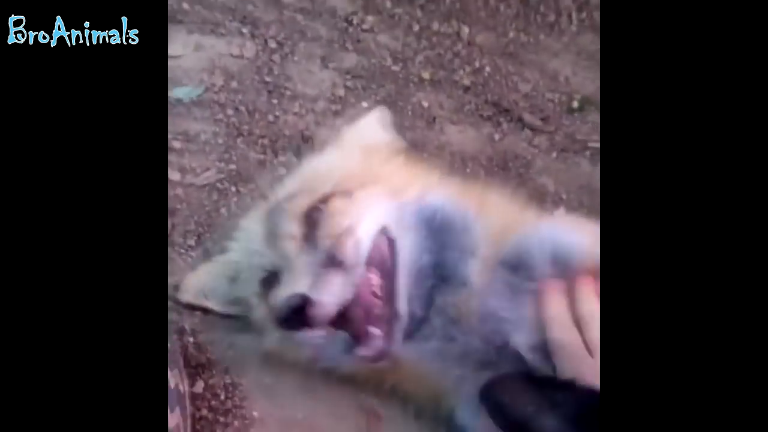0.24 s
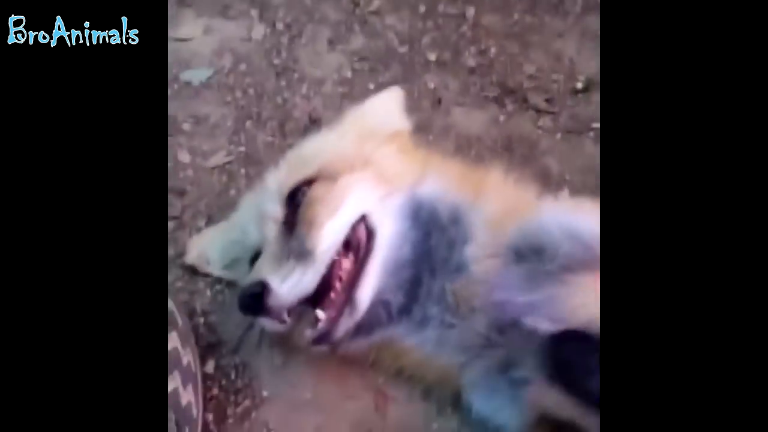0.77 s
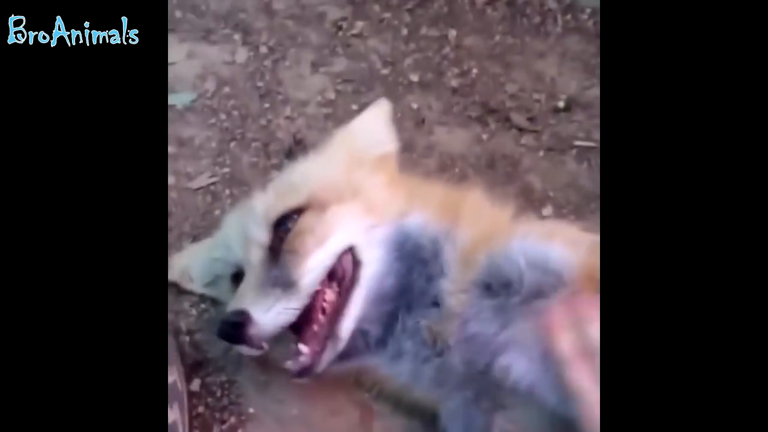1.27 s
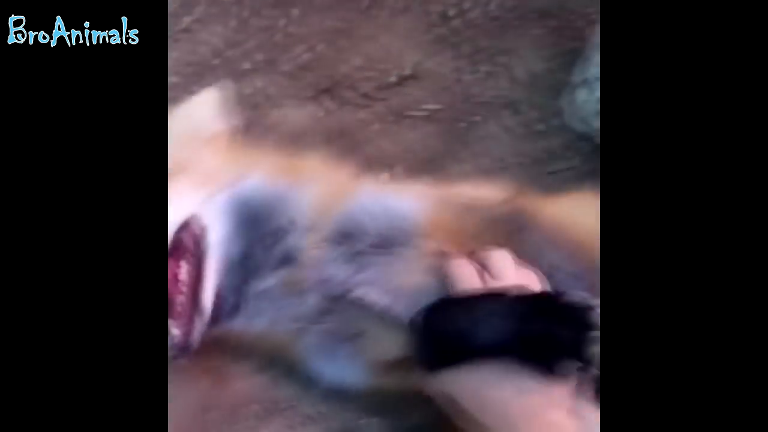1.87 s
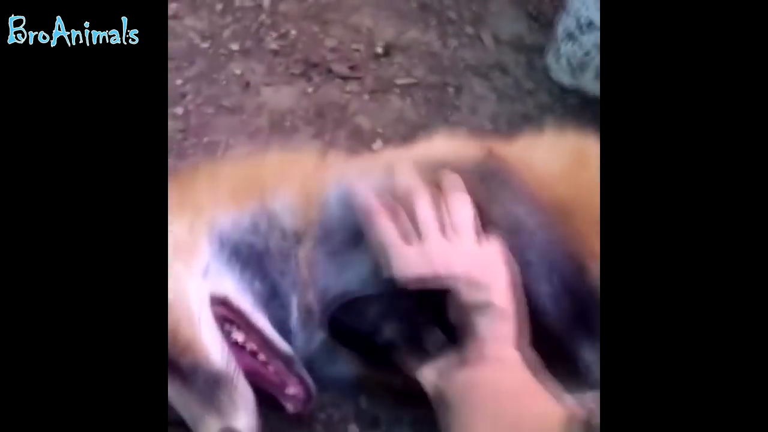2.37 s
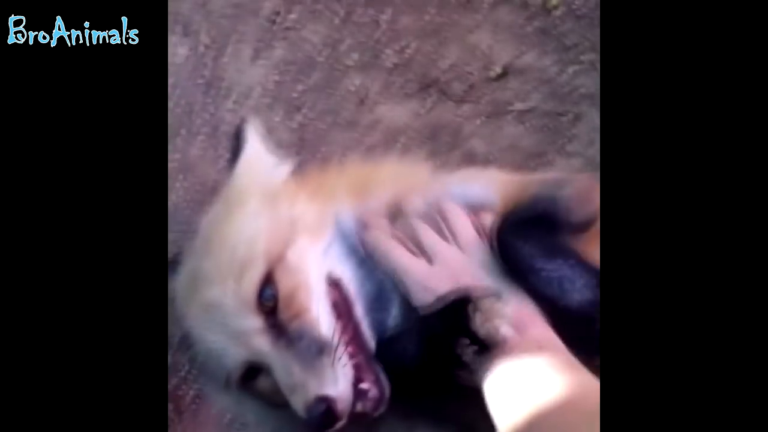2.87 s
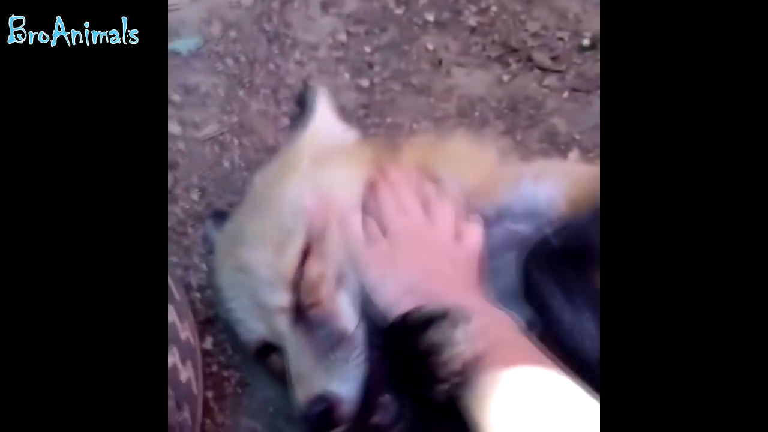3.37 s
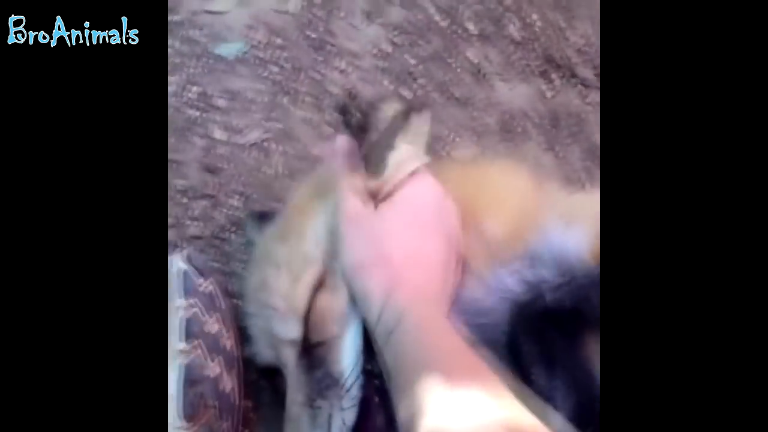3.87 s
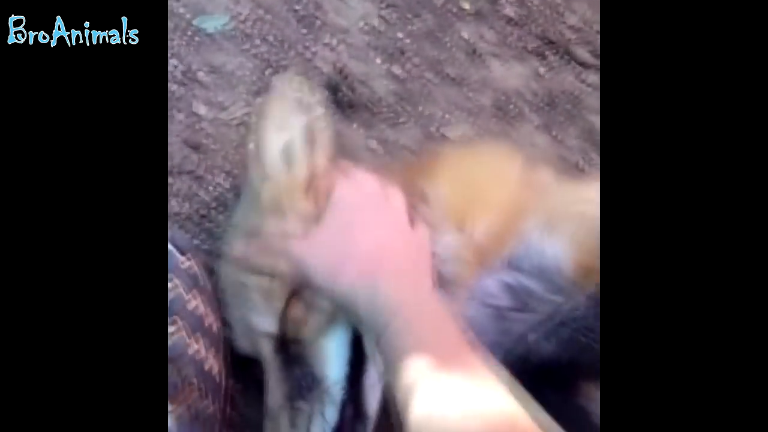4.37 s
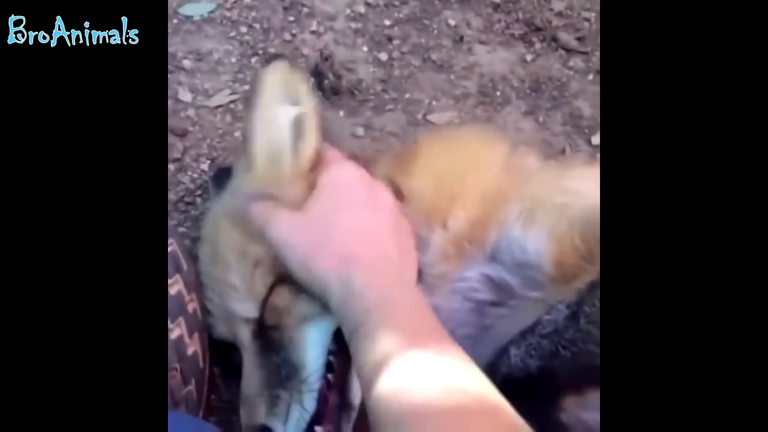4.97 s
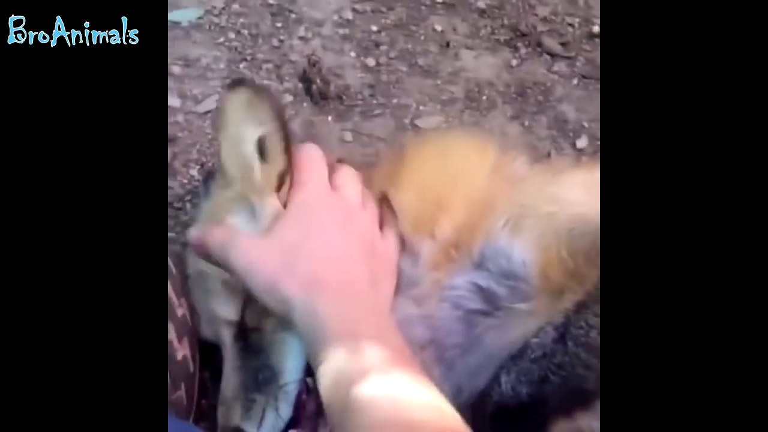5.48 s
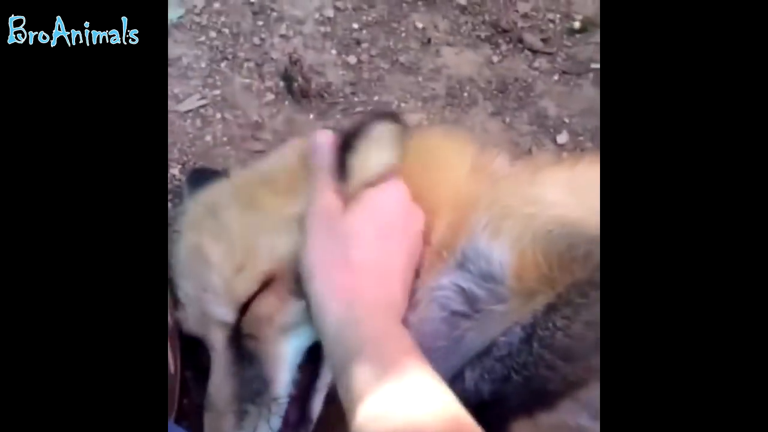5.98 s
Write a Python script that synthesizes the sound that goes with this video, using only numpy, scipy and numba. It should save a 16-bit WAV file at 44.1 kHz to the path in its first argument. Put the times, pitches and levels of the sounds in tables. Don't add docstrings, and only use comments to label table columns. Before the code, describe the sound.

A fox vocalizes close to a phone outdoors, nearly dry, over very faint low yard rumble. It opens mid-cry: a bright, nasal whine around 600 Hz, fluttering about 24 times a second like a bleating giggle, until 0.7 s. After a short gap, a longer whine from 0.9 to 2.1 s starts low and raspy, climbs to its loudest, highest point near 1.5-1.6 s, then smooths and fades. Shorter, slightly lower fluttering whines follow at 2.25-2.8 and 2.95-3.55 s, then a weaker, sinking one at 3.7-4.0 s. From 4.15 s come short hoarse yips around 300-400 Hz: a clear one, a softer rough one at 4.5, low croaky ones at 4.8 and 5.05, a rising and falling one at 5.3-5.5, a loud longer one at 5.7, and a last raspy one near 6.1 s. Breath puffs and soft chest grunts accompany them.

```python
import sys
import numpy as np
from scipy import signal
from scipy.fft import rfft, irfft, next_fast_len
from scipy.io import wavfile
from scipy.ndimage import uniform_filter1d
from numba import njit

SR = 44100
rng = np.random.default_rng(int(sys.argv[2]) if len(sys.argv) > 2 else 0)


def store_wav(level_fs):
    pcm = np.round(np.clip(np.atleast_2d(level_fs), -1, 1) * 32767)
    wavfile.write(sys.argv[1], SR, pcm.T.astype(np.int16))


def volts_from_decibels(level):
    exponent = np.asarray(level, float) / 20
    return 10 ** exponent


N = 275139
HOP = 32
SLACK_HZ = 340


def voice(count=34):
    # t/s, jaw resonance f/Hz, tongue resonance f/Hz
    cavities = [(0, 1266, 3140), (.35, 1295, 3220), (.7, 1108, 2528), (.96, 1044, 2475), (1.4, 1192, 2998),
                (1.54, 1375, 2300), (1.72, 1248, 2793), (2.05, 1274, 2175), (2.3, 1428, 2223),
                (2.6, 1070, 2435), (3.02, 1249, 2265), (3.4, 1146, 2517), (3.72, 874, 2326),
                (3.95, 875, 2352), (4.2, 847, 3034), (5.2, 850.4, 2830), (5.44, 972, 2317),
                (5.8, 876, 2926)]
    # t/s, jaw width/Hz, tongue width share
    widths = [(0, 400, 0.78), (.2, 320, 1.01), (.45, 280, 1.01), (.7, 347, 0.9), (.96, 451, 1.01),
              (1.2, 402, 0.78), (1.5, 400, 1.01), (1.75, 350, 1.4), (2.05, 349, 1.3), (2.3, 500, 0.88),
              (2.6, 446, 1.01), (3.02, 603, 1.2), (3.2, 599, 1.01), (3.45, 498, 1.3), (3.8, 404, 0.89),
              (4.2, 400, 0.89), (5.44, 504, 0.67), (5.8, 400, 1.05)]
    # f/Hz, level/dB
    teeth_colour = [(3500, -4), (4400, 5.5), (5210, 5), (6200, 2.5), (8530, -7.5), (9780, -14.5),
                    (11200, -18), (13300, -22), (15500, -38.5)]

    t = np.arange(N // HOP + 2) * HOP / SR
    hz, db, dip_db, (held_hz, lift_db, rasp_db, bite_db, rough) = flutter(t, rise=.24, fall_s=.0052)
    jaw_db, tongue_db, teeth_db = mouth(held_hz, lift_db, rasp_db, bite_db)
    jaw_hz, tongue_hz = rows(cavities, t)
    jaw_width_hz, tongue_share = rows(widths, t)
    tongue_width_hz = tongue_share * np.clip(11.0 * (held_hz - SLACK_HZ), 650., 1500.)
    rough = rough - .0012 * dip_db

    f = np.arange(1, count + 1)[:, None] * hz
    scatter = np.exp(2j * np.pi * rng.random((count, 1)))
    teeth = shape(teeth_colour, f) * (f > 3600) * (f < 15500) * scatter
    teeth = teeth / np.sqrt(np.sum(np.abs(teeth) ** 2, axis=0))

    voiced = np.clip((hz - SLACK_HZ) / 200, .15, 1)
    partial = volts_from_decibels(0.62 * dip_db) * cavity(f, hz, 66.0)
    partial = partial + volts_from_decibels(jaw_db) * cavity(f, jaw_hz, jaw_width_hz)
    partial = partial - volts_from_decibels(tongue_db + .9 * dip_db) * cavity(f, tongue_hz, tongue_width_hz)
    partial = partial + voiced * volts_from_decibels(teeth_db + 2.5 + .15 * dip_db) * teeth
    partial = partial * volts_from_decibels(np.clip(f / 1000, .6, 5.) * walk(35, count, len(t), SR / HOP))
    gain = volts_from_decibels(db) / np.sqrt(np.sum(np.abs(partial) ** 2, axis=0))
    partial = partial * gain * np.sqrt(2)

    hiss_db = np.minimum(teeth_db + 20 * np.log10(gain * voiced), db - 11)
    hiss_db = uniform_filter1d(hiss_db - 1.35 * dip_db * (db > -45), size=16)

    fine = np.arange(N) / SR
    fray_rad = (.05 - .12 * dip_db) * walk(160, count, len(t), SR / HOP)
    shake = np.interp(fine, t, rough) * walk(430, 2, N, SR)
    phase = 2 * np.pi * np.cumsum(np.interp(fine, t, hz) * (1 + .3 * shake[0])) / SR
    k = np.arange(count)[:, None]
    fray_share = np.minimum(k, 6) * np.minimum(k / 4, 1)
    sound = sing(partial, fray_share * fray_rad, phase, HOP)
    return sound * (1 + 1.3 * shake[1]), phase, np.interp(fine, t, hiss_db)


def flutter(t, rise, fall_s):
    s, crest_hz, crest_db, sag, dip_db, *colour = flaps()
    flap_hz, flap_db = crest_hz * (1 - sag), crest_db - dip_db
    k = np.clip(np.searchsorted(s, t, side="right") - 1, 0, len(s) - 1)
    j = np.minimum(k + 1, len(s) - 1)

    snap = np.where(dip_db[k] > 20, .85, 1)
    rise_s = rise * np.clip(s[j] - s[k], .015, .045) * snap
    after = np.exp(-((t - s[k]) / rise_s) ** 1.5)
    before = np.exp(-(np.abs(s[j] - t) / fall_s) ** 2) * (j > k)
    slack = np.exp(-(np.abs(t - s[k]) / (.85 * rise_s)) ** 2.3)
    drop = before ** (1 / 1.2 ** 2)
    creep = np.clip((s[j] - t) / (s[j] - s[k] + 1e-9), 0, 1)
    slack = slack + .2 * (creep - .35 - slack)

    hz = crest_hz[k] + (flap_hz[k] - crest_hz[k]) * slack + (flap_hz[j] - crest_hz[k]) * drop
    db = crest_db[k] + (flap_db[k] - crest_db[k]) * after + (flap_db[j] - crest_db[k]) * before
    db = db + 2 * (.5 - creep) * (1 - after) * (1 - before)
    held = [uniform_filter1d(c[k], size=30) for c in (crest_hz, *colour)]
    return hz, db, np.clip(db - crest_db[k], -20, 0), held


def flaps():
    # t/s, pitch at the flap f/Hz, pitch after it f/Hz, level after it/dB, dip/dB
    flaps_a = [(-0.008, 602, 595.5, -14, 3.5), (0.034, 517.4, 585.6, -15.5, 5), (0.072, 514, 601, -14, 11),
               (0.113, 537, 617.3, -13, 7), (0.156, 550, 614, -11, 8.5), (0.196, 563, 639.5, -10.5, 7),
               (0.236, 580, 638, -14.5, 5.5), (0.273, 583.4, 641.6, -16, 5), (0.314, 567, 634, -15, 7.5),
               (0.353, 564.5, 622, -15.5, 9), (0.394, 549, 637.4, -15.5, 6), (0.436, 566, 647, -12, 4.5),
               (0.475, 572, 625, -15, 3.5), (0.517, 538, 601, -17, 4), (0.563, 512, 588.6, -19, 8),
               (0.603, 524, 596, -15.5, 8.5), (0.649, 530.5, 580.4, -13.5, 6.5),
               (0.679, 569, 555, -13.5, 0), (0.707, 550, 547, -26, 5)]
    flaps_b = [(0.898, 415.4, 412, -20.5, 38.5), (0.936, 368.4, 513, -16, 7.9),
               (0.974, 441.3, 521.5, -13.0, 7), (1.012, 410.4, 483, -16.5, 3.3),
               (1.05, 413, 539, -13.5, 4.3), (1.088, 479, 567.7, -15.5, 6.2), (1.128, 483, 558, -14, 4.7),
               (1.17, 486, 554.6, -14, 8.3), (1.208, 473.4, 581, -14.5, 8.5), (1.244, 533, 597, -12, 6.2),
               (1.284, 511.4, 566, -11, 8.7), (1.32, 508, 599, -10.5, 8.5), (1.354, 550, 654, -13.5, 3.3),
               (1.393, 595.4, 639.6, -13, 3.6), (1.428, 561, 619, -11.5, 6.3),
               (1.469, 585, 674, -10.5, 6.4), (1.5, 625.2, 699.3, -7, 8.0), (1.538, 631, 667, -8.5, 8.7),
               (1.575, 602, 680, -9.5, 8.3), (1.611, 623.5, 700, -11, 7.4), (1.65, 625, 669.6, -13, 3.5),
               (1.685, 600, 634, -13.5, 6.1), (1.726, 563, 632, -12.0, 7.9),
               (1.767, 544.6, 664, -15.5, 7.1), (1.812, 585.6, 656, -18, 2.56),
               (1.85, 558, 642, -18.5, 3.7), (1.894, 582, 645.5, -22.5, 0.73), (1.937, 568, 614, -26, 1.5),
               (1.984, 530, 613, -21.5, 1.7), (2.03, 559, 585, -20, 1.5)]
    flaps_c = [(2.252, 537, 548, -24, 32), (2.28, 459, 572, -13.5, 10), (2.317, 489, 549, -15, 1.9),
               (2.362, 448, 557, -19, 3.9), (2.41, 491.4, 570, -16.0, 4.4), (2.456, 492, 553, -18, 3.0),
               (2.497, 495, 567, -16, 8.0), (2.542, 496, 562.6, -15.5, 7.4), (2.583, 489, 548, -17.5, 3.0),
               (2.628, 487, 560, -17.5, 7.0), (2.671, 504.5, 566.6, -15.5, 8.4),
               (2.716, 500, 540, -20.0, 2.7), (2.768, 459, 460.7, -19.5, 2.0),
               (2.795, 476.4, 471, -35.5, 1.0)]
    flaps_d = [(2.962, 528, 533, -27, 32), (2.991, 452, 499, -15, 7.2), (3.023, 456.3, 492.7, -16, 6.3),
               (3.057, 446.7, 489.5, -17.5, 6.6), (3.097, 445, 536.5, -17.0, 8.5),
               (3.139, 460.4, 555.6, -15, 7.7), (3.183, 508, 550, -15.5, 7.0),
               (3.225, 475.6, 537, -18, 5.3), (3.265, 494, 565, -15.5, 8.5), (3.309, 524, 575.5, -14, 6.4),
               (3.35, 505, 536, -17, 6.5), (3.391, 479, 524, -19, 6.0), (3.435, 453.6, 497.5, -19.5, 4),
               (3.484, 415, 441.7, -23, 2.7), (3.521, 372, 371.3, -32, 1.1)]
    flaps_e = [(3.695, 428.5, 429.7, -25.5, 37), (3.743, 343.5, 459.6, -23.5, 8.3),
               (3.781, 387, 431.2, -19.5, 3.1), (3.828, 368, 435.8, -22.0, 1.3),
               (3.871, 399, 465.5, -23, 2.0), (3.914, 384.8, 416.1, -19, 4.5),
               (3.95, 386.7, 382.7, -15.5, 3.5), (3.984, 308.1, 306.7, -23.5, 2.7)]
    # t/s, jaw lift/dB, rasp/dB, teeth lift/dB
    mouth_a = [(0, -4, 5.5, 1.5), (.1, -2, -3, -4.5), (.2, -4.5, 1.5, -8.5), (.3, -6.5, -8, -8.5),
               (.44, 3.5, -6, -8), (.55, 3, -2, -4.5), (.64, 4.5, 2, -2), (.7, 11.5, 17.5, 3),
               (0.721, 2.5, 19, 21.5)]
    mouth_b = [(.92, -12, 4.5, 3), (.95, 6, 18.5, 12.5), (1.05, 5, 10.5, 11), (1.25, 2, -0.5, 0),
               (1.45, -0.5, -10.5, -9.5), (1.54, -2, -2.5, -1.5), (1.72, 0, -15, -13),
               (1.9, -4.5, -10.5, -7), (2.05, -4, -6, -15)]
    mouth_c = [(2.259, -12, -8, -16.5), (2.3, 2.5, 12, -4), (2.397, -2, -5.5, -4.5), (2.56, -1, 3, -5.5),
               (2.69, -2.5, -2, -9), (2.74, -3, 5, 1), (2.786, 9.5, 5.5, 9.5), (2.81, -8.5, 15, 8.5)]
    mouth_d = [(2.97, -5, 2.5, -13), (3.01, 6, 16, 4), (3.08, 0, 0, 4), (3.16, 0.5, -3.5, -2.5),
               (3.25, -1.5, -9, -4.5), (3.31, -1, -5.5, -14), (3.41, 2, -1, 1.5), (3.502, 9.5, 8.5, 12.5),
               (3.54, -5, 13, 25)]
    mouth_e = [(3.72, -14, -3, -6), (3.76, 3.5, 11.5, 7.5), (3.8, 0, 1.5, 5), (3.87, -2, 6.5, 5),
               (3.93, 1.5, -2.5, 8), (3.965, -3.5, -30, 8), (4.0, 1, -9, 2)]
    whine_ends = .724, 2.073, 2.82, 3.548, 4.006
    # t/s, pitch f/Hz, level/dB, dip before it/dB
    yip_puffs = [(4.161, 340, -26.5, 39.5), (4.175, 360, -18, 26.5), (4.216, 386, -14.5, 13),
                 (4.257, 345, -22.5, -3), (4.473, 313, -27, 30.5), (4.485, 314, -28, 4),
                 (4.496, 341, -21.5, 17), (4.53, 318, -20, 7), (4.771, 268, -31.5, 16.5),
                 (4.789, 312, -32, 34.5), (4.806, 295, -26, 16.5), (4.843, 310, -32, -1),
                 (5.042, 300, -32.5, 13.5), (5.07, 301, -26, 15.5), (5.278, 305, -25.5, 24.5),
                 (5.299, 320, -25.5, 9.5), (5.347, 346, -22, 3.5), (5.385, 400, -20, 13.5),
                 (5.421, 497, -22, 1.5), (5.457, 440, -21, 3), (5.493, 371, -25, -0.5),
                 (5.684, 329, -39.5, 4), (5.698, 364, -17, 32.5), (5.728, 390, -16, 15),
                 (5.771, 383, -15.5, 17.5), (5.815, 320, -21, 8), (6.042, 321, -37, 6),
                 (6.073, 357, -35, 57), (6.098, 301, -26, 16.5), (6.124, 291, -21.5, 6)]
    # t/s, jaw lift/dB, rasp/dB, teeth lift/dB, roughness (0-1)
    yip_ends = [
        (4.283, -3.5, 3, -9.5, 0.09),
        (4.564, 3.5, 9, 2, 0.18),
        (4.869, 8, 0, -9, 0.35),
        (5.105, 2.5, 9, 0, 0.3),
        (5.41, 4, 10, 5.5, 0.15),
        (5.512, 4.5, -3, 9.5, 0.1),
        (5.839, -2, -6, -8, 0.11),
        (6.14, 3, 0, 13, .25),
    ]
    pause_db, close_dip_db = -73, 18.5
    tail_s, tail_drop_db, tail_sag = .026, 17.5, .14

    out = []
    tables = (flaps_a, flaps_b, flaps_c, flaps_d, flaps_e)
    curves = (mouth_a, mouth_b, mouth_c, mouth_d, mouth_e)
    for curve, table, end in zip(curves, tables, whine_ends):
        last_hz, last_db = table[-1][2], table[-1][3]
        closing = (end, last_hz, last_hz, pause_db, pause_db - last_db + close_dip_db)
        s, low_hz, hz, db, dip_db = np.transpose([*table, closing])
        rough = .008 + .12 * np.exp(-(s - s[0]) / .1) * (s[0] > 0)
        lifts = rows(curve, s + np.gradient(s) / 2)
        out += list(np.transpose([s, hz, db, 1 - low_hz / hz, dip_db, *lifts, rough]))

    start = 0
    for end, *colour in yip_ends:
        puffs = [(s, hz, db, .035, dip_db, *colour) for s, hz, db, dip_db in yip_puffs if start < s < end]
        out += puffs
        hz, db = puffs[-1][1] * (1 - tail_sag), puffs[-1][2] - tail_drop_db
        if not any(0 < s - end < tail_s for s, *_ in yip_puffs):
            out += [(end, hz, db, 0, -tail_drop_db, *colour)]
            out += [(end + tail_s, hz, pause_db, 0, pause_db - db + close_dip_db / 2, *colour)]
        start = end
    return np.transpose(out)


def mouth(held_hz, lift_db, rasp_db, bite_db):
    climb = held_hz - SLACK_HZ
    jaw_db = np.minimum(-16.5 + 0.15 * climb, 10) + lift_db
    tongue_db = -37.5 + 0.1688 * climb + rasp_db
    teeth_db = -30.5 + 0.1268 * climb + bite_db
    return jaw_db, tongue_db, teeth_db


def cavity(hz, centre_hz, width_hz):
    h = 1 / (1 + 1j * (hz / centre_hz - centre_hz / hz) * centre_hz / width_hz) ** 2
    return h / np.sqrt(np.sum(np.abs(h) ** 2, axis=0))


@njit
def sing(partial, wobble, phase, hop):
    out = np.zeros(len(phase))
    for i in range(len(phase)):
        j = i // hop
        u = i / hop - j
        for k in range(len(partial)):
            a = partial[k, j] + u * (partial[k, j + 1] - partial[k, j])
            angle = (k + 1) * phase[i] + wobble[k, j] + u * (wobble[k, j + 1] - wobble[k, j])
            out[i] += a.real * np.cos(angle) - a.imag * np.sin(angle)
    return out


def breath(phase, hiss_db):
    # start t/s, swell/s, fade/s, level/dB
    pant_table = [(3.588, 0.00094, 0.0041, -53.5), (3.712, 0.00078, 0.0054, -46),
                  (3.74, 0.00095, 0.0057, -34.5), (5.909, 0.000898, 0.005, -54.5), (4.476, .001, .005, -52),
                  (4.503, .001, 0.0078, -48), (6.081, .002, 0.0065, -50.5), (6.1, .002, .014, -49),
                  (3.957, 0.0094, 0.06, -43.5), (4.193, 0.039, 0.1, -41.5), (4.43, 0.012, 0.0086, -57.5),
                  (4.487, 0.043, 0.1, -44), (4.632, 0.011, 0.032, -52), (4.754, 0.0071, 0.015, -56),
                  (4.795, 0.041, 0.076, -45.5), (4.977, 0.013, 0.022, -54.5), (5.052, 0.064, 0.03, -48.5),
                  (5.172, 0.018, 0.042, -66), (5.284, 0.081, 0.0319, -44), (5.442, 0.029, 0.062, -38.5),
                  (5.69, 0.11, 0.082, -39.5), (5.918, 0.015, 0.026, -82), (6.072, 0.088, 0.02, -51.5)]
    # f/Hz, level/dB
    air = [(350, -40), (700, -20), (1250, -17), (1900, 3.5), (2500, -4), (3300, 5.5), (4600, -6),
           (5500, -0.5), (6400, 3), (7600, -5), (9200, -11), (11000, -16), (13300, -21), (15500, -37.5)]
    t = np.arange(N) / SR
    pants = 0
    for s, swell, fade, db in pant_table:
        pants = pants + volts_from_decibels(db) * np.interp(t - s, [0, swell, swell + .8 * fade, swell + fade], [0, 1, .45, 0])
    puff = 1 + .45 * np.cos(phase)
    return (volts_from_decibels(hiss_db - 6) + pants) * puff * patchy(hiss(air, 2000.), spread_db=4.)


def patchy(x, spread_db):
    _, _, z = signal.stft(x, nperseg=256)
    field = uniform_filter1d(walk(25, len(z), z.shape[1], SR / 128), size=4, axis=0)
    return signal.istft(z * volts_from_decibels(spread_db * field / field.std()), nperseg=256)[1][:N]


def cheek_pocket(fox):
    # t/s, f/Hz, share open (0-1)
    pocket = [(0, 3870, 0.5), (.6, 3540, 0.99), (1.1, 4650, 0.94), (1.42, 4561, 0.5), (1.52, 4433, 0),
              (1.6, 4510, 0.64), (1.75, 4073, 1), (2.05, 3772, 0.99), (2.3, 4034, 0.57), (2.5, 4100, 0.91),
              (2.57, 3890, 0.8), (2.64, 4250, 0.95), (2.77, 4200, 1), (3., 4240, 0.5), (3.1, 4220, 0.7),
              (3.17, 4500, .7), (3.23, 4786, 1), (3.5, 4684, 0.95), (3.75, 4600, 0.8), (3.95, 4690, 1),
              (4.3, 4831, 0.6), (6.2, 4199, 0.34)]
    hz, share = rows(pocket, np.arange(N) / SR)
    hz = hz * (1 + .015 * walk(9, 1, N, SR)[0])
    share = np.clip(share + .05 + .04 * walk(5, 1, N, SR)[0], 0, 1)
    hollow = notch(fox, hz, 480.0)
    hollow = notch(hollow, 0.97 * hz, 400.)
    hollow = notch(hollow, 1.055 * hz, 430.0)
    return fox + share * (hollow - fox)


def nasal_branch(fox):
    # t/s, f/Hz, share (0-1)
    nasal = [(0, 1910, 1), (.35, 1950, 0.75), (.5, 1721, 1), (.75, 1690, 1), (1., 1793, 0.75),
             (1.3, 1880, 0.4), (1.5, 1698, 0.36), (2.05, 2193, 0), (2.3, 1937, 0.24), (3.5, 1892, 0.19),
             (3.8, 1600, 0.5), (4.2, 1755, 0.88), (5.2, 1751, 0.77), (5.45, 1752, 0.14), (5.7, 1748, 1)]
    hz, share = rows(nasal, np.arange(N) / SR)
    return fox + np.clip(share, 0, 1) * (notch(fox, hz, 500.0) - fox)


def high_notches(fox):
    # t/s, lower f/Hz, upper f/Hz, share (0-1)
    high_bands = [(0, 9660, 12840, 0.7), (.3, 9500, 12400, 0.8), (.7, 9600, 12770, 0.7), (.95, 9990, 12800, .6),
                  (1.3, 9310, 12300, 0.6), (1.6, 10320, 12600, .7), (2.05, 9785, 12500, .7),
                  (2.3, 10160, 12360, .8), (2.55, 10010, 12030, .9), (2.8, 10000, 12300, 0.8),
                  (3.0, 10000, 12300, .8), (3.3, 9910, 12400, .9), (3.55, 9700, 12200, .8),
                  (4.0, 9696, 12200, 0.8), (6.2, 9700, 12200, .3)]
    low_hz, high_hz, share = rows(high_bands, np.arange(N) / SR)
    drift = 1 + .012 * walk(8, 1, N, SR)[0]
    share = np.clip(share + 0.18 * walk(12, 1, N, SR)[0], 0, 1)
    hollow = notch(fox, drift * low_hz, 810.0)
    hollow = notch(hollow, 1.03 * low_hz, 830.0)
    hollow = notch(hollow, high_hz / drift, 900.)
    return fox + share * (hollow - fox)


@njit
def notch(x, hz, width_hz):
    y, b, l = np.empty(len(x)), 0., 0.
    for i in range(len(x)):
        g, k = np.tan(np.pi * hz[i] / SR), width_hz / hz[i]
        v = (b + g * (x[i] - l)) / (1 + g * (g + k))
        b, l, y[i] = 2 * v - b, l + 2 * g * v, x[i] - k * v
    return y


def chest():
    # t/s, length/s, pitch f/Hz, level/dB
    grunts = [(0.893, 0.042, 120, -44.5), (2.257, 0.035, 128.6, -46.5), (2.96, 0.077, 130.4, -47),
              (3.554, 0.047, 250, -48.5), (3.7, 0.057, 110, -43.5), (4.17, .12, 170, -43.5),
              (4.477, .1, 176.6, -45), (4.781, 0.13, 160, -40), (5.055, 0.1, 140, -45),
              (5.28, 0.21, 162, -36.5), (5.527, 0.077, 1300, -55), (5.701, 0.13, 171.4, -51.5),
              (6.08, 0.095, 159.3, -47.5)]
    t, f = np.arange(N) / SR, np.fft.rfftfreq(N, 1 / SR) + 1
    noise = rfft(rng.standard_normal(N))
    out = 0
    for s, length, hz, db in grunts:
        ring = 1 / (1 + (1.3 * max(hz / 250, 1) * (f / hz - hz / f)) ** 2)
        swell = np.interp(t - s, [0, length / 4, 0.75 * length, length], [0.00048, 0.8, 0.39, 0.016])
        out = out + volts_from_decibels(db) * swell * irfft(noise * ring / np.sqrt(np.mean(ring ** 2)), N)
    return out


def ground_echo(fox):
    t = np.arange(int(SR / 5)) / SR
    tail = uniform_filter1d(rng.standard_normal(len(t)), size=4) * volts_from_decibels(-60 * t / .11) * (t > .003)
    return signal.fftconvolve(fox, tail / np.sqrt(np.sum(tail ** 2)))[:N]


def yard():
    # f/Hz, level/dB
    rumble = [(28, -25.5), (60, -16.5), (236, -2.5), (599, -14.5), (673, -9.5), (774, -15.5), (1290, -22.5),
              (1830, -22), (2980, -23.5), (4030, -30), (7040, -30.5), (13500, -38.5), (15500, -59)]
    return volts_from_decibels(-50 + 2.5 * walk(24.0, 1, N, SR)[0]) * hiss(rumble, 20.)


def hiss(spectrum, over_hz):
    f = np.fft.rfftfreq(N, 1 / SR)
    gain = shape(spectrum, f)
    return irfft(rfft(rng.standard_normal(N)) * gain / np.sqrt(np.mean(gain ** 2 * (f > over_hz))), N)


def shape(spectrum, hz):
    f, db = np.transpose(spectrum)
    return volts_from_decibels(np.interp(np.log(hz + 1), np.log(f), db))


def rows(table, t):
    s, *columns = np.transpose(table)
    return [np.interp(t, s, c) for c in columns]


def walk(rate, count, size, sr):
    k = max(int(sr / rate), 1)
    w = uniform_filter1d(uniform_filter1d(rng.standard_normal((count, size)), k), k)
    return w / w.std()


def scene():
    sound, phase, hiss_db = voice()
    fox = sound + breath(phase, hiss_db)
    fox = high_notches(nasal_branch(cheek_pocket(fox)))
    fox = signal.sosfilt(signal.butter(4, 170., "high", fs=SR, output="sos"), fox)
    duck = 1 / (1 + 2.7 * np.sqrt(np.abs(uniform_filter1d(fox ** 2, size=4000))))
    return (fox + volts_from_decibels(-25) * ground_echo(fox) + chest() + duck * yard())[None]


def roll_off(x):
    return signal.sosfilt(signal.butter(12, 15670, fs=SR, output="sos"), x)


def record(dry):
    size = next_fast_len(N + 8192)
    f = np.fft.rfftfreq(size, 1 / SR)
    soft = dry / (1 + (dry / .93) ** 6) ** (1 / 6)
    top_step = np.where(f > 13900, volts_from_decibels(-5.0), 1)
    rumble_cut = 1 + volts_from_decibels(11.5) / (1 + (f / 70) ** 4)
    mix = irfft(rfft(soft, size) * top_step / rumble_cut, size)[:, :N]
    return roll_off(mix)


dry = scene()
out = record(dry)
store_wav(out)
```